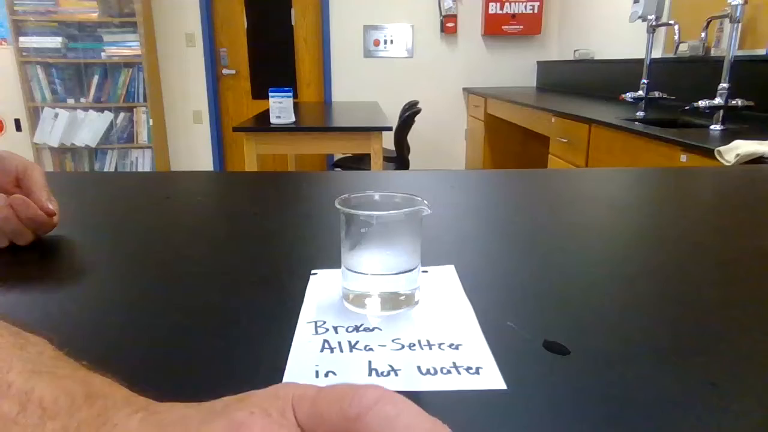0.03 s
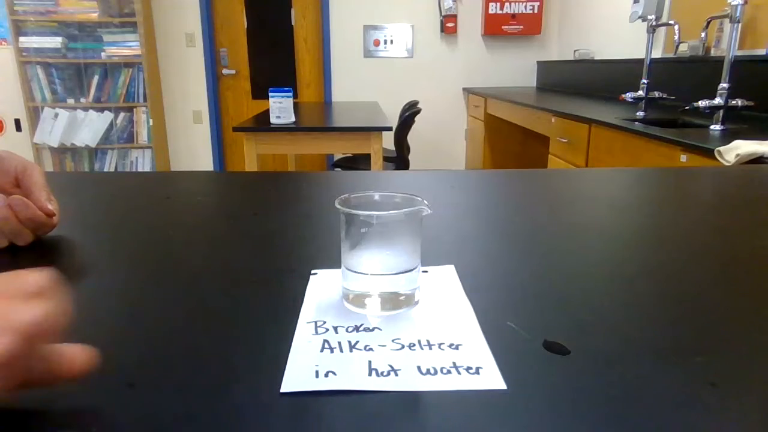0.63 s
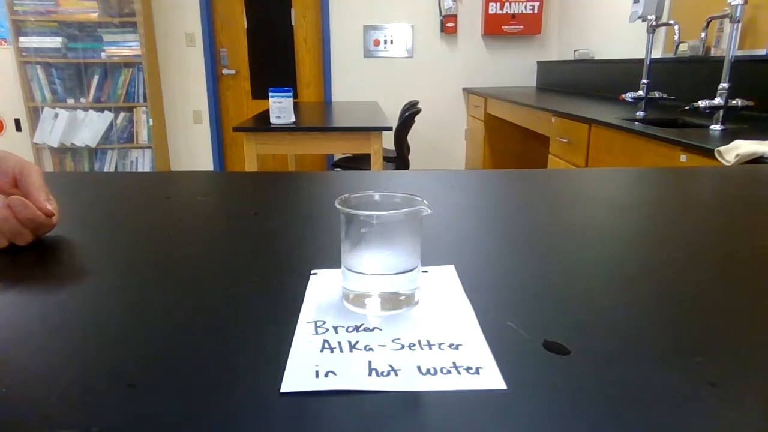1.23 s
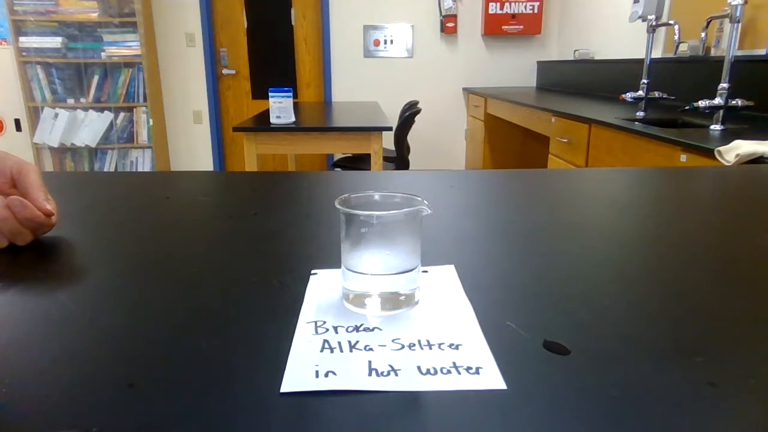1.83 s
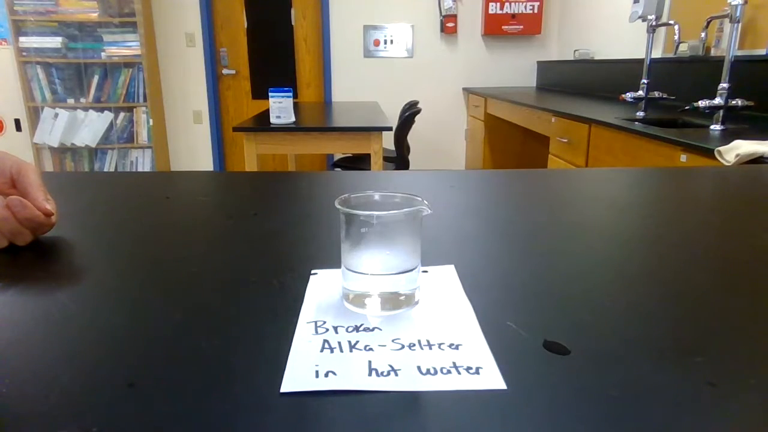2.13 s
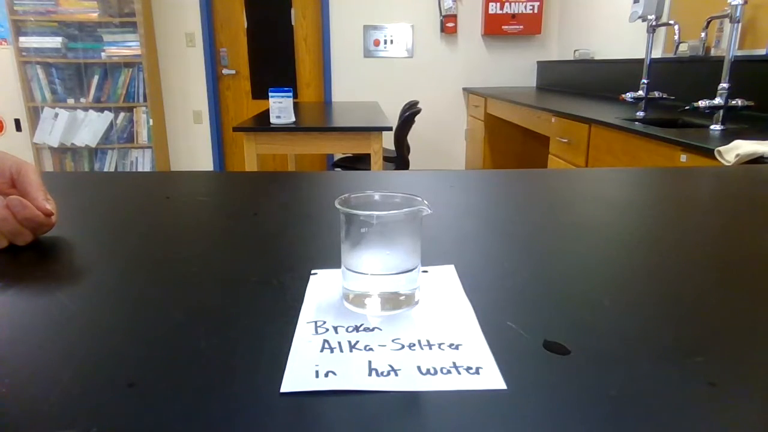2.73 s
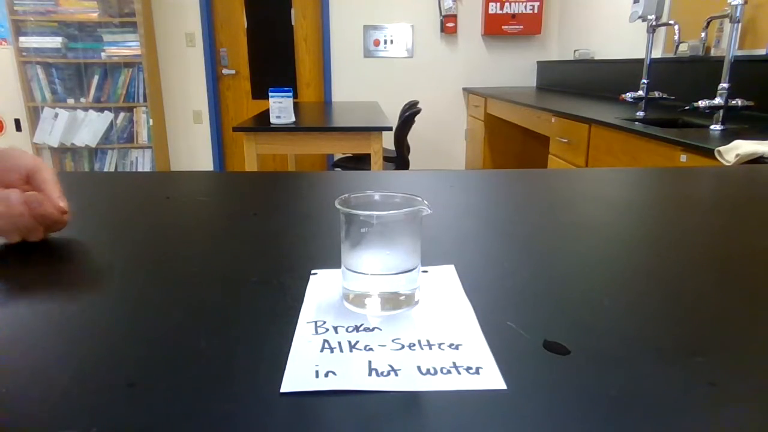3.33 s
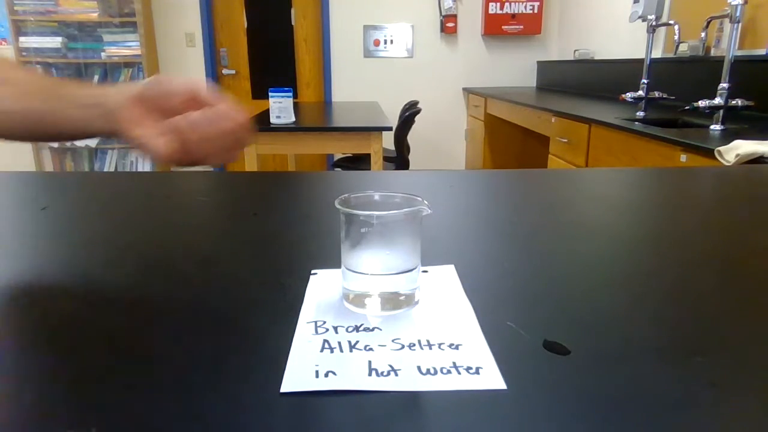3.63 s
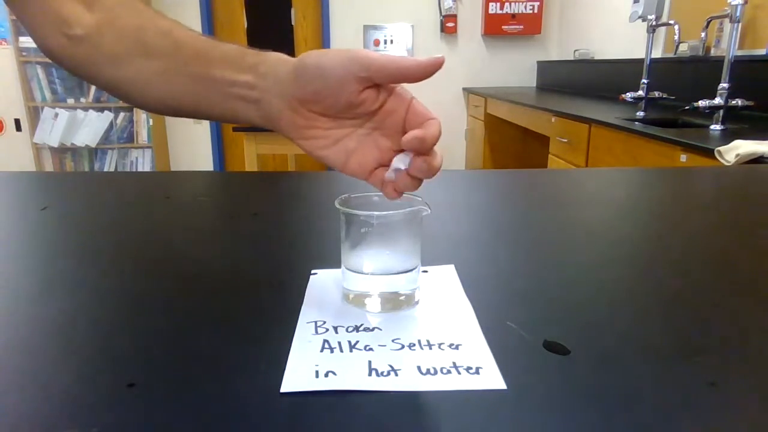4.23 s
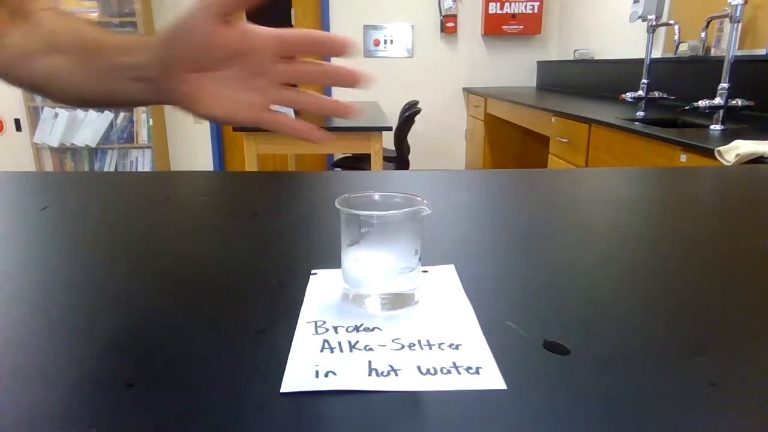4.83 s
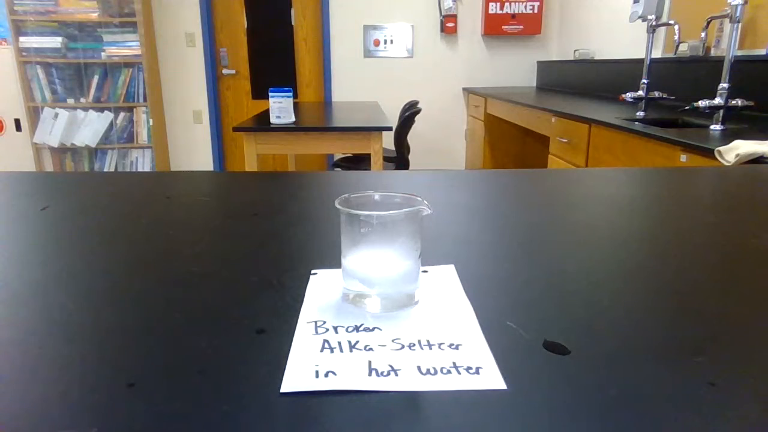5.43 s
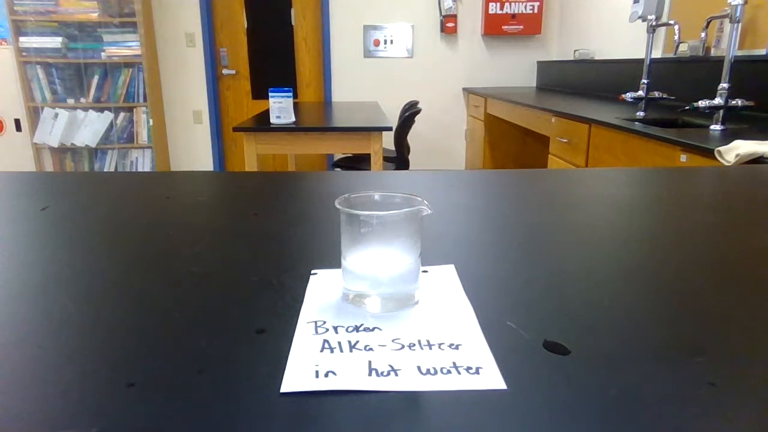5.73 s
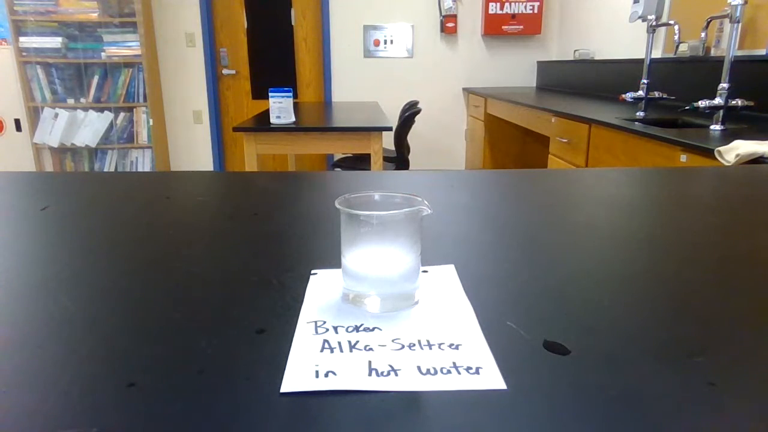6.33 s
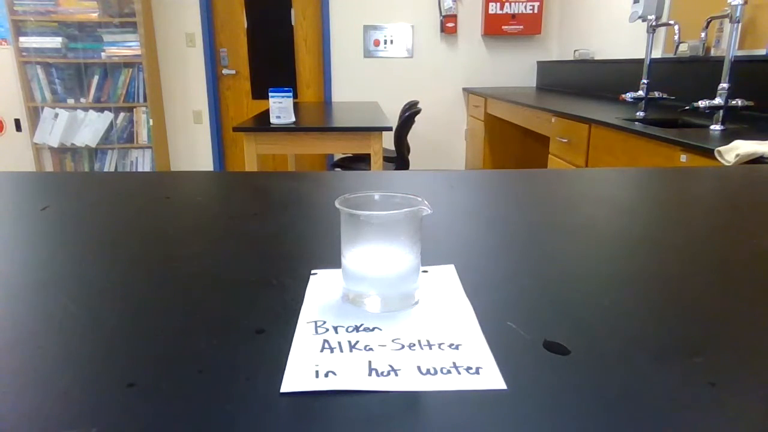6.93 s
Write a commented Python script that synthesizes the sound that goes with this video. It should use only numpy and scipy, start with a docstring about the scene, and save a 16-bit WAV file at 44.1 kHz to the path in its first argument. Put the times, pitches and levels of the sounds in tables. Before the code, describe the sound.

A hand slides and knocks on a bench, then tablet pieces plop into a glass beaker of water and fizz over a ventilation hum.

```python
"""Ventilation hums in a laboratory throughout. At 0.3 s a hand slides over the bench, dry skin hissing;
from 0.8 s it knocks three times, and the bench top thuds. The fingers shift and tick faintly.
At 4.5 s pieces of a tablet drop into a beaker of hot water: they snap, ring the glass, slap the water
and drag an air pocket under, which plops. From 4.6 s they give off gas, and countless tiny bursts
swell to a fine, even fizz in the resonances of the beaker."""
import sys
import numpy as np
from scipy import signal
from scipy.fft import rfft, irfft
from scipy.io import wavfile

SR = 44100
rng = np.random.default_rng(int(sys.argv[2]) if len(sys.argv) > 2 else 0)


def pcm_store(signal):
    """Save signal as 16-bit PCM."""
    levels = np.round(np.clip(np.atleast_2d(signal), -1, 1) * 32767)
    wavfile.write(sys.argv[1], SR, levels.astype(np.int16).T)


N = 311787
T = np.arange(N) / SR
HZ = np.fft.rfftfreq(N, 1 / SR)


def amp(db):
    """Decibels to gain."""
    return 10 ** (np.asarray(db) / 20)


def unit(x):
    """Scales to rms 1."""
    return x / np.sqrt(np.mean(x ** 2) + 1e-30)


def read(points, hz):
    """Interpolates a table on a log-frequency axis."""
    table_hz, value = np.transpose(points)
    return np.interp(np.log(hz + 1), np.log(table_hz), value)


def colour(x, gain):
    """Filters by a gain per frequency."""
    return irfft(rfft(x) * gain, N)


def drift(rate_hz):
    """Slow random signal, rms 1."""
    return unit(colour(rng.standard_normal(N), np.exp(-(HZ / rate_hz) ** 2)))


def noise_pair(likeness):
    """Stereo white noise; likeness, clipped to +-1, is the left-right correlation."""
    same = np.clip(read(likeness, HZ), -1, 1)
    mid, side = rng.standard_normal((2, N))
    mid = colour(mid, np.sqrt((1 + same) / 2))
    side = colour(side, np.sqrt((1 - same) / 2))
    return np.array([mid + side, mid - side])


def resonate(x, hz, width_hz):
    """Two-stage resonance of gain 1; its pitch may move."""
    turn = np.exp(2j * np.pi * np.cumsum(hz * np.ones(N)) / SR)
    pole = np.exp(-np.pi * width_hz * np.sqrt(2) / SR)
    baseband = signal.lfilter([(1 - pole) ** 2], [1, -2 * pole, pole * pole], x / turn)
    return 2 * (turn * baseband).real


def ring(modes):
    """Decaying modes of a struck body."""
    t = T[:SR // 2]
    return sum(amp(db - 60 * t / t60_s) * np.sin(2 * np.pi * hz * t) for hz, db, t60_s in modes)


def lean(x, balance):
    """Pans band by band."""
    half_db = read(balance, HZ) / 2
    return colour(x, amp([half_db, -half_db]))


def from_side(x, lag_s=0.00013):
    """Sound from the side reaches the left microphone later; the top octave stays in step."""
    turn = np.exp(1j * np.pi * np.minimum(HZ * lag_s, 1))
    return colour(x, np.array([turn ** -2, np.ones(len(HZ))]))


def room(x, early_db, late_db, early_t60_s=0.05):
    """Adds quick reflections from the bench, then the tail of the laboratory."""
    # tail decay (frequency [Hz], t60 [s])
    decay = [(250, .5), (1000, .45), (2500, .4), (4000, .3), (8000, .3), (15000, .28)]
    # reflections (frequency [Hz], left-right likeness [1])
    likeness = [(300, 0.42), (1000, 1), (2200, 0.69), (4500, 0.37), (6800, 1), (15000, 0.58)]
    t = T[:SR // 2]
    hz, frame_s, spectra = signal.stft(noise_pair(likeness)[:, :len(t)], SR, nperseg=256)
    spectra = spectra * amp(-60 * frame_s / read(decay, hz)[:, None])
    late = signal.istft(spectra, SR, nperseg=256)[1][:, :len(t)] * (t > .008)
    early = noise_pair(likeness)[:, :len(t)] * amp(-60 * t / early_t60_s) * (t > .0015)
    echo = amp(late_db) * late / np.linalg.norm(late[0])
    echo += amp(early_db) * early / np.linalg.norm(early[0])
    return x + signal.fftconvolve(x[None], echo, axes=1)[:, :N]


def ventilation(air_db=-53.5, waver_hz=5):
    """Duct rumble, air noise, microphone hiss; wavering fan and mains tones, thin whine, light buzz."""
    # duct noise, microphone hiss above 7 kHz (frequency [Hz], relative density [dB])
    spectrum = [(12, -2.5), (20, -5), (32, -5), (45, -12.5), (65, -16), (130, -15.5), (180, -16),
                (250, -20), (430, -21.5), (560, -26.5), (1000, -36), (1700, -40.5), (3500, -47.5),
                (6500, -49), (7200, -49), (15500, -46.5)]
    # the same noise (frequency [Hz], left-right likeness [1])
    likeness = [(40, 0.94), (300, 0.89), (1000, 0.51), (2000, 0.054), (6600, .02), (7100, 1)]
    # fan and mains tones, electronic whine at 8 kHz (frequency [Hz], level [dB], waver depth [1])
    tones = [(30.2, -57, 0.5), (121, -64.5, 0.66), (205.8, -59.5, 0.08), (356.4, -79, 1),
             (412.8, -69.5, 0.32), (546.6, -79.5, .5), (605, -79.5, 0.3), (1030, -87, 0.6),
             (8000, -95, 0.7)]
    # lights (mains ripple [Hz], harmonic level at 1 kHz [dB], fall [dB/octave])
    buzz = (120.05, -88.5, 9.3)
    # whole background (frequency [Hz], left minus right [dB])
    balance = [(60, 0.5), (200, -1.8), (500, -1.2), (2000, -1.2), (5000, 0)]
    out = amp(air_db) * unit(colour(noise_pair(likeness), amp(read(spectrum, HZ))))
    for hz, db, depth in tones:
        in_phase, quadrature = 1 + depth * drift(waver_hz), depth * drift(waver_hz)
        phase = 2 * np.pi * (hz * T + rng.random())
        out += amp(db) * unit(in_phase * np.cos(phase) + quadrature * np.sin(phase))
    ripple_hz, buzz_db, fall_db = buzz
    for hz in ripple_hz * np.arange(6, 16):
        peak = np.sqrt(2) * amp(buzz_db - fall_db * np.log2(hz / 1e3))
        out += peak * np.sin(2 * np.pi * (hz * T + rng.random()))
    return lean(out, balance)


def stroke(length_s, speed_exponent=0.37, release_s=0.031):
    """Gain of one stroke: hand speed rises and falls in one arch, then the hiss dies away."""
    speed = np.sin(np.pi * np.minimum(T[:SR] / length_s, 1)).clip(0)
    pole = np.exp(-1 / (release_s * SR))
    power = signal.lfilter([1 - pole], [1, -pole], (speed ** speed_exponent) ** 2)
    return np.sqrt(power / power.max())


def hand():
    """Dry skin hisses: the arm slides off the bench, fingers shift, the hand reaches out and lets go."""
    # rubs (start [s], length [s], level [dB])
    strokes = [(0.301, 0.56, -49), (1.567, 0.018, -74), (2.727, 0.04, -72), (3.68, 0.34, -79),
               (4.48, 0.019, -52.5)]
    # skin hiss (frequency [Hz], relative density [dB])
    spectrum = [(700, -28), (1600, -18), (3000, -9.5), (4500, -4.5), (6000, -7), (7500, -5.5), (9000, 0),
                (11000, -1.5), (14500, 2), (16000, 2)]
    # skin hiss (frequency [Hz], left-right likeness [1])
    likeness = [(500, .9), (1400, .88), (2300, .7), (4500, .8), (6500, .97), (9000, .76), (15000, .76)]
    envelope = np.zeros(N)
    for start_s, length_s, db in strokes:
        add(envelope, start_s, amp(db) * stroke(length_s))
    return envelope * unit(colour(noise_pair(likeness), amp(read(spectrum, HZ))))


def add(mix, start_s, sound):
    """Mixes a sound in at start_s."""
    part = mix[round(start_s * SR):][:len(sound)]
    part += sound[:len(part)]


def knocks(thud_t60_s=0.051, modes_db=-2):
    """A hard click, then the crowded modes of the bench top die as a dry thud."""
    # knocks (time [s], thud gain [dB], thud low edge [Hz], thud high edge [Hz], click gain [dB])
    hits = [(0.7924, -37.5, 278, 2600, -29), (1.0175, -49.5, 447, 900, -80),
            (1.1032, -45.5, 750, 2040, -62)]
    # two clearest bench modes (frequency [Hz], relative level [dB], t60 [s])
    bench_modes = [(768, -2, 0.05), (1633, -8, .07)]
    # hard contact (frequency [Hz], relative level [dB], t60 [s])
    click_modes = [(1930, -11, 0.0065), (3058, -13, 0.035), (4150, -11, 0.014), (5660, 3.5, 0.0025),
                   (6650, -6, 0.0026), (9100, -11, .004), (11900, -7, 0.0026), (14500, -11, .003)]
    out, t = np.zeros(N), T[:SR // 2]
    for time_s, thud_db, low_hz, high_hz, click_db in hits:
        crowded = 2 * rng.standard_normal(len(t)) * amp(-60 * t / thud_t60_s)
        band = signal.butter(2, [low_hz, high_hz], "bandpass", fs=SR)
        thud = signal.lfilter(*band, crowded + amp(modes_db) * ring(bench_modes))
        add(out, time_s, amp(thud_db) * thud + amp(click_db) * ring(click_modes))
    return out


def ticks(band_hz=(8500, 14500), t60_s=0.0043):
    """Fingers and nails flick: tiny, bright treble ticks."""
    # flicks (time [s], gain [dB])
    flicks = [(0.301, -50), (4.338, -46), (4.4892, -52)]
    out, t = np.zeros(N), T[:SR // 20]
    for time_s, db in flicks:
        add(out, time_s, amp(db - 60 * t / t60_s) * rng.standard_normal(len(t)))
    return 2 * signal.lfilter(*signal.butter(3, band_hz, "bandpass", fs=SR), out)


def tablet(snap_attack_s=0.0003, snap_t60_s=0.008):
    """Each piece snaps dryly, rings the water-damped glass and slaps the water."""
    # impacts (time [s], glass gain [dB], slap gain [dB], snap gain [dB])
    pieces = [(4.5008, -31, -72, -47), (4.5026, -35.5, -33, -34), (4.5077, -44, -56, -57),
              (4.5122, -48, -38.5, -41), (4.5358, -50, -39.5, -39), (4.606, -51.5, -42.5, -37.5),
              (4.6376, -56, -75, -46)]
    # glass wall (frequency [Hz], relative level [dB], t60 [s])
    glass_modes = [(3068, -10, .016), (3510, 0, .02), (3800, -8, .018), (4447, -7, .022), (6400, -29, .25),
                   (7004, -12, .035), (7990, 2, .013), (8134, -19, .05), (9146, -7, .015),
                   (10050, -9, .012), (11350, -11, .012), (12310, -16, .02), (13300, -13, .02)]
    # air above the water (frequency [Hz], relative level [dB], t60 [s])
    cavity_modes = [(760, -37, 0.11), (1225, -15, 0.055), (1334, 2.5, 0.014), (1460, -15, 0.05),
                    (2000, -13, 0.0058)]
    # dry snap (frequency [Hz], relative density [dB])
    spectrum = [(1000, -28), (4000, -3), (7500, 5), (11500, 4), (14500, 2), (16000, -3)]
    out, glass, cavity = np.zeros(N), ring(glass_modes), ring(cavity_modes)
    grit = unit(colour(rng.standard_normal(N), amp(read(spectrum, HZ))))
    t = T[:len(glass)]
    envelope = 1.3 * (1 - np.exp(-t / snap_attack_s)) * amp(-60 * t / snap_t60_s)
    for time_s, glass_db, slap_db, snap_db in pieces:
        snap = grit[round(time_s * SR):][:len(t)] * envelope
        add(out, time_s, amp(glass_db) * glass + amp(slap_db) * cavity + amp(snap_db) * snap)
    return out


def plop(rise_s=0.0024):
    """A trapped air pocket rings and rises in pitch as it nears the surface."""
    # air pocket (time [s], level [dB], first pitch [Hz], last pitch [Hz], t60 [s])
    pocket = (4.533, -40, 860, 1130, .042)
    time_s, db, first_hz, last_hz, t60_s = pocket
    out, t = np.zeros(N), T[:SR // 4]
    hz = last_hz + (first_hz - last_hz) * np.exp(-t / rise_s)
    add(out, time_s, amp(db - 60 * t / t60_s) * np.sin(2 * np.pi * np.cumsum(hz) / SR))
    return out


def gas_flow(tau_s, start_s=4.632):
    """The wetted pieces give off gas: a rise from 0 that levels off at 1."""
    return 1 - np.exp(-np.maximum(T - start_s, 0) / tau_s)


def fizz(spray_db=-55, water_db=-68.5, churn_db=-66.5, surge_db=0.4):
    """Tiny bursts merge into a hiss, bubbly water rings, larger bubbles churn around the pieces."""
    # beaker resonances (frequency [Hz], width [Hz], relative gain [dB])
    resonances = [(1282, 280, 2.5), (4950, 1520, -7), (8350, 2300, -5.5), (9400, 1240, -1.5),
                  (12460, 1700, 1), (14100, 3000, -5)]
    # fizz (frequency [Hz], left-right likeness [1])
    likeness = [(500, 0.7), (1400, 0.7), (2300, 0.9), (3600, 0.46), (4700, 1.7), (8500, 2.8), (11000, -0.2),
                (13000, 1.3), (15500, .85)]
    clear_hz, cloudy_hz = 4140, 3484  # gas softens the water, so its resonance sinks
    water_hz = clear_hz + (cloudy_hz - clear_hz) * gas_flow(tau_s=0.25)
    wander = 1 + .012 * drift(rate_hz=2.5)
    spray = sum(amp(db) * resonate(noise_pair(likeness), hz * wander, width_hz)
                for hz, width_hz, db in resonances)
    water = resonate(noise_pair(likeness), water_hz * wander, width_hz=1060)
    churn = resonate(noise_pair(likeness), hz=865, width_hz=500)
    surge = amp(surge_db * drift(rate_hz=9))  # gas leaves unevenly
    return surge * (amp(spray_db) * gas_flow(tau_s=0.41) * unit(spray)
                    + amp(water_db) * gas_flow(tau_s=0.12) * unit(water)
                    + amp(churn_db) * gas_flow(tau_s=0.71) * unit(churn))


def scene():
    """Rubs and knocks at the side, finger ticks and beaker ahead, over the ventilation."""
    # rubs and knocks (frequency [Hz], left minus right [dB])
    aside_balance = [(300, 0.5), (2400, -0.5), (4400, -0.5), (6800, 1), (9500, -7), (12300, -4.5),
                     (15000, -4)]
    # ticks and beaker sounds (frequency [Hz], left minus right [dB])
    ahead_balance = [(500, -1), (2700, -1.5), (3750, 3.5), (4800, -0.5), (8400, -0.3), (9900, -9.5),
                     (12000, -10), (13300, -6), (14800, 0)]
    aside = from_side(hand() + room(knocks(), early_db=-8, late_db=-9.5))
    ahead = room(ticks() + tablet() + plop(), early_db=-8, late_db=-16) + fizz()
    return lean(aside, aside_balance) + lean(ahead, ahead_balance) + ventilation()


def record(dry, open_s=0.072, cutoff_hz=15780):
    """The input opens after a moment of silence; a steep low-pass limits the band."""
    gate = np.clip((T - open_s) * SR / 64, 0, 1)
    lowpass = signal.firwin(1023, cutoff_hz, window=("kaiser", 8), fs=SR)
    return signal.oaconvolve(dry * gate, lowpass[None], "same")


dry = scene()
out = record(dry)
pcm_store(out)
```